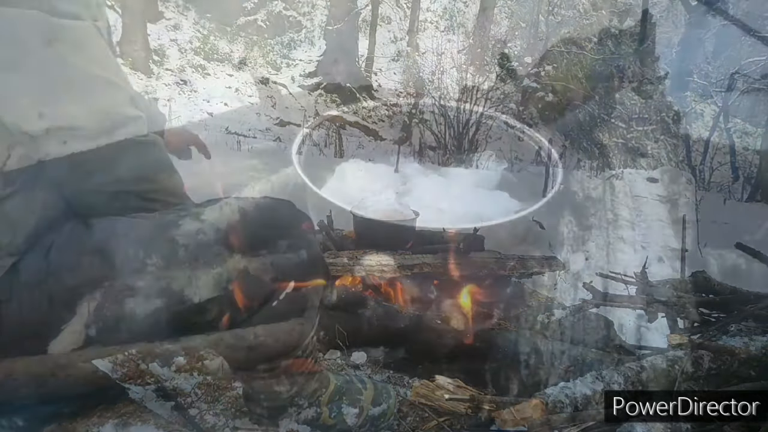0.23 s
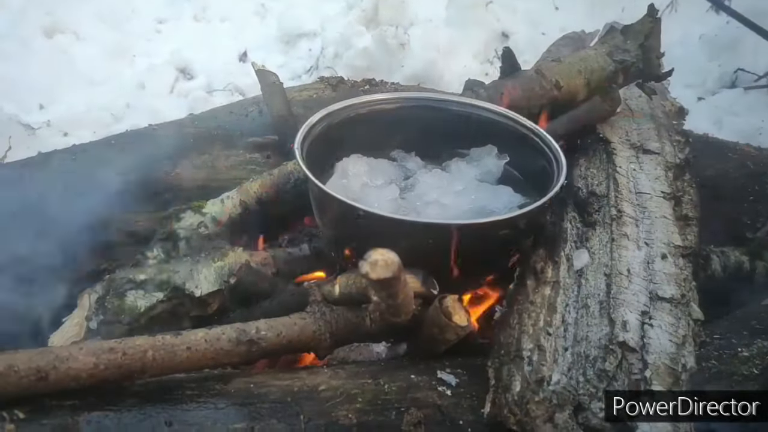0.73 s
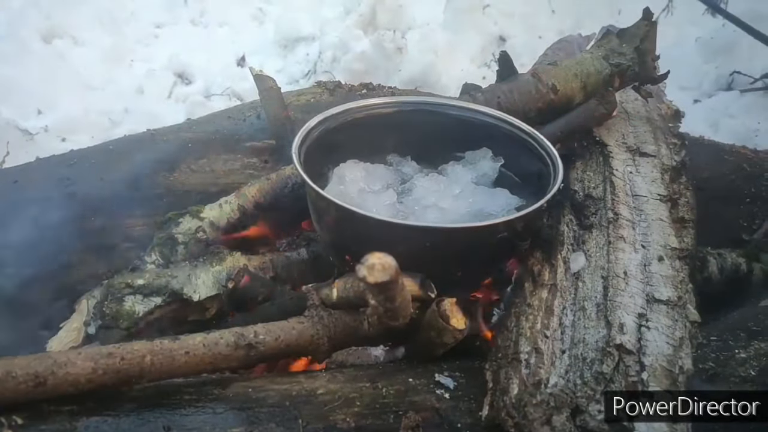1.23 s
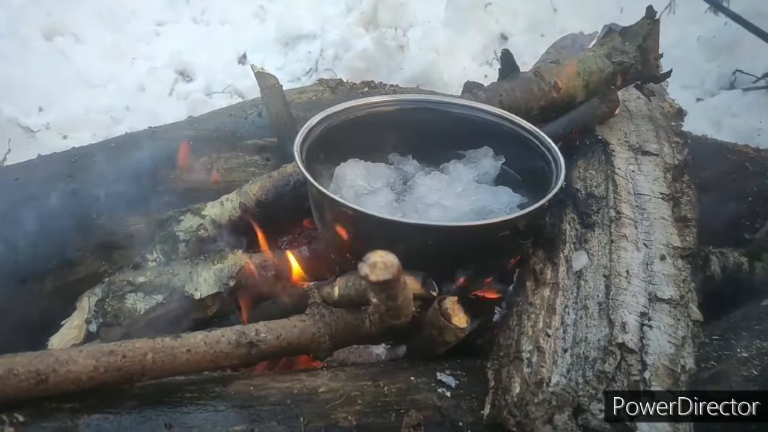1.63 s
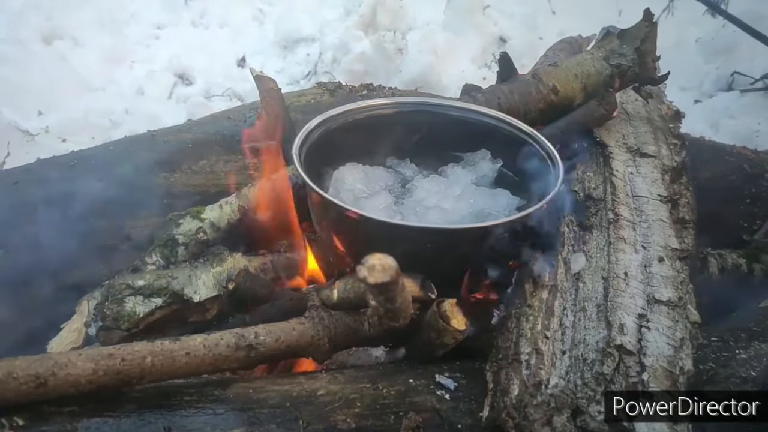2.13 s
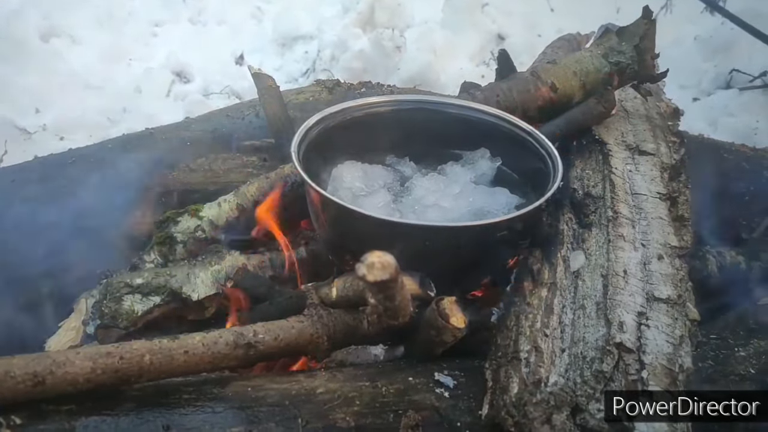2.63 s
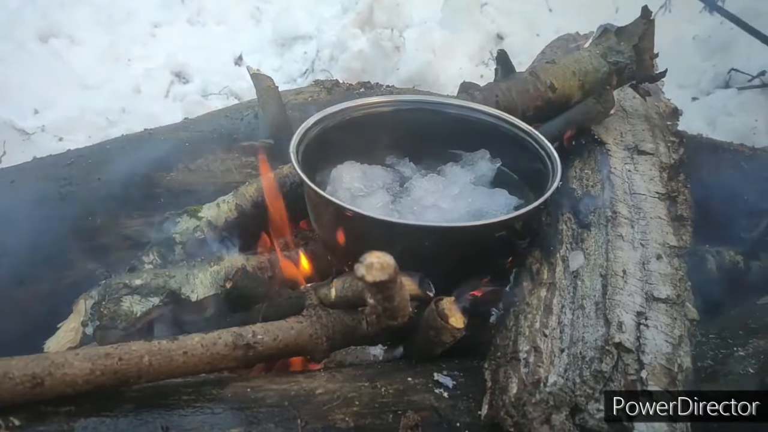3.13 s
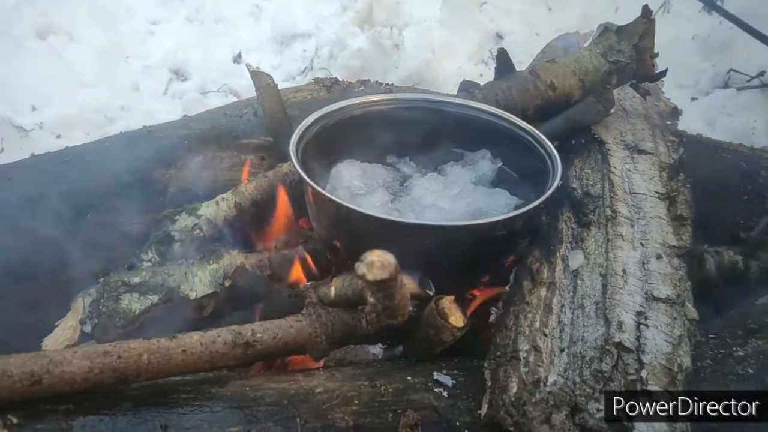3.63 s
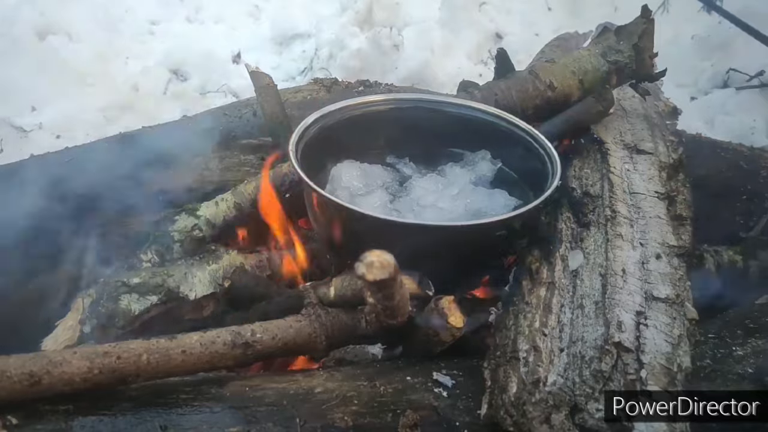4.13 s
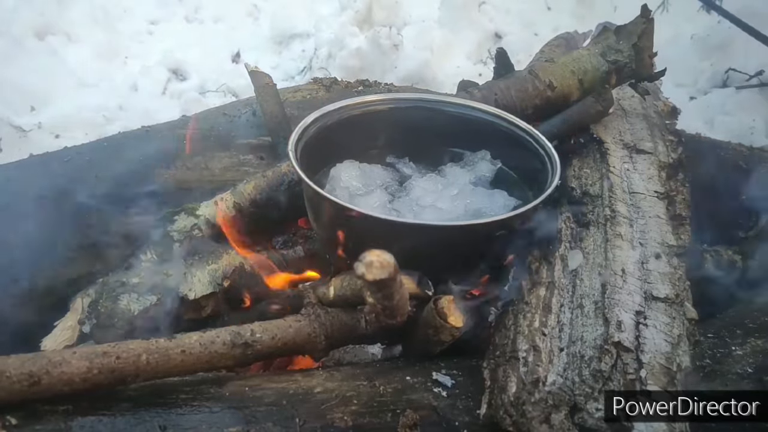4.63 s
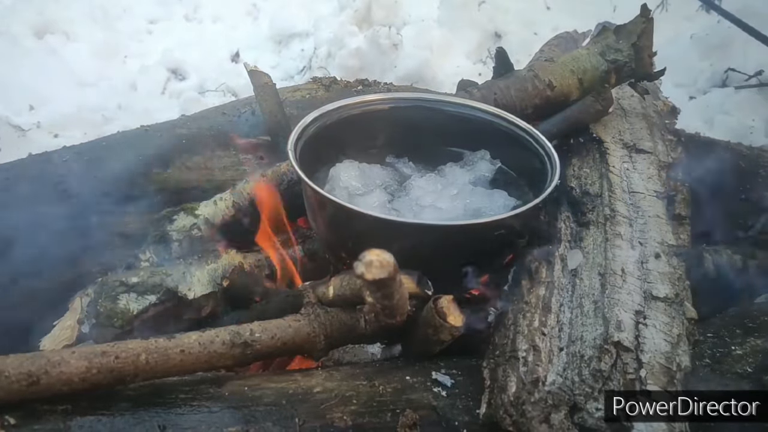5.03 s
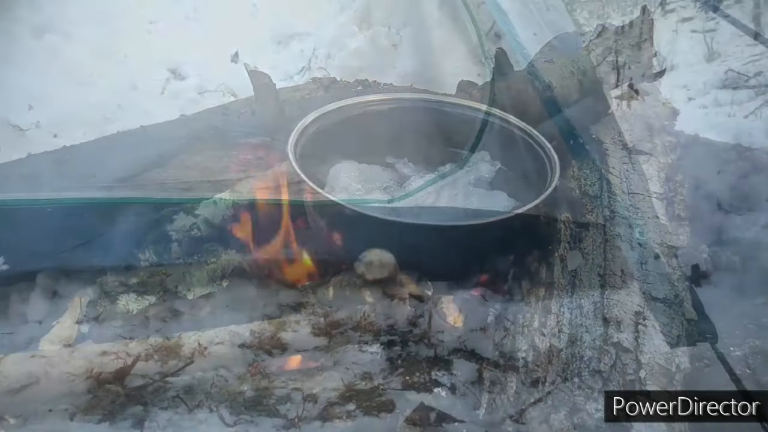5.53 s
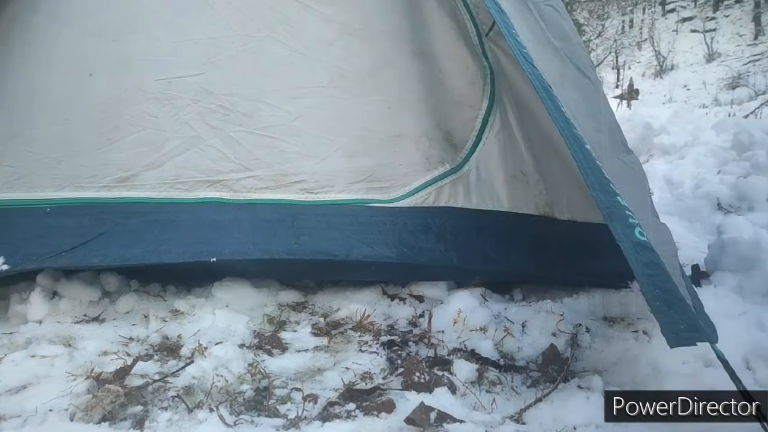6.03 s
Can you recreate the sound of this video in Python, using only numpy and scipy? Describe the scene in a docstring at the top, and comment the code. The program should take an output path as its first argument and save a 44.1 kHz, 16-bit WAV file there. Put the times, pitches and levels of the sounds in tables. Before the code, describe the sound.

Quiet distant woodland air and wind rumble, with small bright ticks, break off for a moment. A damp-wood fire appears suddenly at close range, sizzling grainily over a low fluttering roar, with scattered snaps and duller pops. Two hard wind knocks come early on the right. Finally heavy steps crush crusty snow near a tent, the fire stops abruptly, and wind rumbles mostly on the left.

```python
"""A camp fire heard in a snowy wood: first from afar, then after a short silence close by, then at a tent.
Steam hisses from damp logs as noise with coarse grains; the flames roar softly below it, with flares.
Wood cracks and pops as short decaying tones; boots crunch snow as dense clicks over dull thuds, first
under the end of the fire. Wind buffets the two microphone ports as low, slowly varying noise with
sharp pushes on the right; a faint air of the wood is heard far from the fire."""
import sys
import numpy as np
from scipy import signal
from scipy.fft import rfft, irfft, next_fast_len
from scipy.io import wavfile

SR = 44100
rng = np.random.default_rng(int(sys.argv[2]) if len(sys.argv) > 2 else 0)


def file_out(sig):
    """Save sig as 16-bit WAV at sys.argv[1]."""
    # one column per channel
    cols = np.atleast_2d(sig).T
    # limit, then scale
    lim = np.clip(cols, -1, 1)
    pcm = np.round(lim * 32767).astype(np.int16)
    wavfile.write(sys.argv[1], SR, pcm)


N = 276639
SIZE = next_fast_len(N)
HZ = np.maximum(np.fft.rfftfreq(SIZE, 1 / SR), 1)
T = np.arange(N) / SR
FIRE_LAG_S, TENT_LAG_S = .00016, .00034   # the left port hears later


def from_db(db):
    """Amplitude ratio: 20 dB is a factor of ten."""
    return 10 ** (np.asarray(db) / 20)


def rms_one(x):
    """Normalisation to unit effective value."""
    return x / np.sqrt(np.mean(x ** 2) + 1e-20)


def in_time(rows):
    """Linear interpolation in time: the columns of a curve, sample by sample."""
    s, *columns = np.transpose(rows)
    return [np.interp(T, s, c) for c in columns]


def at_hz(points):
    """Interpolation over log frequency: a spectral curve, bin by bin."""
    hz, values = np.transpose(points)
    return np.interp(np.log(HZ), np.log(hz), values)


def panned(db):
    """Level difference between the ports: half is added at the left and half taken from the right."""
    return from_db(np.array([db / 2, -db / 2]))


def during(start_s, end_s):
    """Rectangular gate: one between two times, otherwise zero."""
    return (T >= start_s) & (T < end_s)


def drift(rate_hz):
    """Lowpass random process: noise through a double real pole, scaled to spread 1."""
    step = 40   # samples between the drawn values
    pole = np.exp(-2 * np.pi * rate_hz * step / SR)
    noise = rng.standard_normal(N // step + 2002)
    slow = signal.lfilter([1], [1, -2 * pole, pole ** 2], noise)[2000:]   # drop the filter's start
    return np.interp(np.arange(N) / step, np.arange(len(slow)), rms_one(slow))


def white():
    """Gaussian white noise: equal power per hertz, in three independent streams."""
    return rng.standard_normal((3, SIZE))


def grains(per_s, spread_db):
    """Shot noise: three streams of random clicks of either sign, their sizes spread in dB; rms 1."""
    size_db = spread_db * np.minimum(rng.exponential(1, (3, SIZE)), 5)
    sizes = from_db(size_db) * rng.choice([-1, 1], (3, SIZE))
    struck = rng.random((3, SIZE)) < per_s / SR
    return rms_one(sizes * struck)


def at_ports(streams, colour, like, balance_db, lag_s, patchy_db, flicker_hz, in_step=1.0, count=10):
    """Partial coherence: a shared and two separate streams, coloured, in flickering bands; rms 1."""
    shared, left, right = rfft(streams)
    like = np.clip(like, 0, 1)   # share of power common to both ports
    late = shared * np.exp(-2j * np.pi * HZ * lag_s)
    common = np.sqrt(like) * np.array([late, shared])
    separate = np.sqrt(1 - like) * np.array([left, right])
    pair = (common + separate) * from_db(at_hz(colour)) * panned(balance_db * np.ones_like(HZ))
    # overlapping bands spread over five octaves from the lowest colour point
    place = (count - 1) * np.clip(np.log2(HZ / colour[0][0]) / 5, 0, 1)
    out, together = 0, drift(flicker_hz / 2)
    for k in range(count):
        weight = np.maximum(1 - abs(place - k), 0)
        band = irfft(pair * weight, SIZE)[:, :N]
        flicker = in_step * together + drift(flicker_hz)
        out = out + band * from_db(patchy_db * flicker)
    return rms_one(out)


def lump(s, peak_db, ms):
    """Pressure pulse: a smooth swelling on a squared-sech time scale, with faint opposite skirts."""
    u = (T - s) / (ms / 1000)
    return from_db(peak_db) * (1 - u ** 2 / 4) / np.cosh(np.clip(u, -20, 20)) ** 2


def bursts(events, cycles, tail_s, tail_db, lag_s=FIRE_LAG_S):
    """Damped resonance: each break rings at its pitch with a band of noise around it."""
    out, t = np.zeros((2, N)), np.arange(3000) / SR
    puffs = rng.standard_normal((len(events), 2, len(t)))
    for (s, peak_db, hz, pan_db), puff in zip(events, puffs):
        # the tone falls 60 dB in the given cycles, the puff 60 dB in tail_s
        snap = np.sin(2 * np.pi * hz * t) * from_db(-60 * t * hz / cycles)
        edges = [.45 * hz, min(2.5 * hz, .45 * SR)]
        puff = rms_one(signal.sosfilt(signal.butter(2, edges, "band", fs=SR, output="sos"), puff))
        tail = from_db(tail_db - 60 * t / tail_s) * puff
        both = from_db(peak_db) * panned(pan_db)[:, None] * (snap + tail)
        for side, start_s in enumerate((s + lag_s, s)):
            i = round(start_s * SR)
            out[side, i:i + len(t)] += both[side]
    return out


# vigour of the fire close by, as the level of its steam: (time [s], level [dB])
FIRE_VIGOUR = [(0.72, -36), (0.87, -32), (1.07, -35), (1.18, -32.5), (1.4, -34), (1.59, -33), (2.07, -34.5),
               (2.57, -34.5), (2.69, -32.5), (2.96, -33.5), (3.1, -31), (3.3, -33.5), (3.53, -33),
               (5.0, -34.5), (5.5, -32), (5.71, -33.5)]
# relative spectrum of the steam: (frequency [Hz], density [dB per Hz])
STEAM_COLOUR = [(500, -16.5), (900, -11.5), (1620, -8.5), (2070, -3), (2800, -4.5), (3270, -1.5),
                (3650, -4.5), (4300, 2), (4900, 0.5), (5750, -7.5), (6000, -1), (6350, -4), (6900, 1.5),
                (7900, -1.5), (9900, 4), (11500, -1), (14000, -2.5), (15700, -7)]
# side difference of the steam: (frequency [Hz], left minus right [dB])
STEAM_BALANCE = [(1000, 0), (7000, 0), (8500, -3.5), (10000, -5.5), (12000, -1.5), (15000, -4.5)]
# coherence of the steam at the two ports: (frequency [Hz], likeness [0-1])
STEAM_LIKENESS = [(1000, 0.05), (3500, 0.37), (6000, 0.57), (7800, 0.03), (8800, 0.37), (10500, 0.47),
                  (12000, 0.27)]


def steam():
    """Jet noise: steam spits from the sap of the logs as broadband noise with coarse grains."""
    level_db, = in_time(FIRE_VIGOUR)
    jets = white() + .5 * grains(per_s=3600, spread_db=3.5)
    hiss = at_ports(jets, STEAM_COLOUR, at_hz(STEAM_LIKENESS), at_hz(STEAM_BALANCE), FIRE_LAG_S,
                    patchy_db=2.6, flicker_hz=14, in_step=.1, count=50)
    return from_db(level_db) * hiss


FLAME_DB, FLAME_SINKS_DB_PER_S = -40.5, 0.32   # at mean vigour, mid-time and mean wind; the flames die down
FLAME_FOLLOWS, FLAME_FANNED = 0.27, 0.21   # shares of the steam's and the wind's level swing [dB per dB]
# relative spectrum of the flames: (frequency [Hz], density [dB per Hz])
FLAME_COLOUR = [(60, 2.5), (150, 3), (330, -11.5), (480, -8), (600, -18), (750, -19), (1200, -23),
                (2000, -29.5)]


def flame():
    """Combustion roar: low noise and small pockets of gas catching, fanned by the wind."""
    steam_db, wind_db = in_time(FIRE_VIGOUR)[0], in_time(WIND_LEVELS)[0]
    level_db = FLAME_DB - FLAME_SINKS_DB_PER_S * (T - T.mean())
    level_db = level_db + FLAME_FOLLOWS * (steam_db - steam_db.mean())
    level_db = level_db + FLAME_FANNED * (wind_db - wind_db.mean())
    puffs = white() + .5 * grains(per_s=160, spread_db=1.5)
    roar = at_ports(puffs, FLAME_COLOUR, like=0.96, balance_db=0.93, lag_s=0,
                    patchy_db=2.0, flicker_hz=35, in_step=.9)
    return from_db(level_db) * roar


# pockets of gas that catch and draw the air in: (time [s], peak level [dB])
FLARES = [(1.4994, -25), (1.652, -34), (1.7521, -24), (2.0054, -21), (2.2128, -22), (2.775, -22.5),
          (3.0177, -23.5), (3.0716, -26.5), (4.0892, -20.5), (4.481, -24.5), (4.7791, -25)]


def flares():
    """Rarefaction pulse: a catching pocket draws the air in, alike at both ports."""
    return -sum(lump(s, peak_db, ms=1.5) for s, peak_db in FLARES)


def fire():
    """Superposition: the steam, the flames and the flares add up in the fire close by."""
    return steam() + flame() + flares()


# cracks of wood, mostly bright, with a lower click and the sharp start of a pop:
# (time [s], tone level before pan [dB], pitch [Hz], left minus right [dB])
CRACKS = [(.1292, -29.5, 7000, 1.5), (.3715, -34, 6000, 3), (.4088, -23, 7960, 1),
          (1.3542, -19.5, 4800, -1), (1.3562, -22, 9000, 4), (1.3657, -15.5, 4500, 6),
          (1.3672, -21, 8500, 5), (2.158, -20, 7000, -3), (2.4555, -27, 900, 3), (3.5134, -13, 7900, 3),
          (3.7083, -25, 1150, 2), (3.8835, -15, 9100, 2), (5.9509, -33, 9000, .3)]


def cracks():
    """Brittle fracture: quickly damped tones, mostly bright, with a lower click and a pop's sharp start."""
    return bursts(CRACKS, cycles=5.5, tail_s=.014, tail_db=-9)


# dull pops in the logs: (time [s], tone level before pan [dB], pitch [Hz], left minus right [dB])
POPS = [(1.506, -33, 480, 3), (1.569, -30, 807, 1), (1.698, -33, 670, -1), (2.454, -35, 400, 2),
        (3.708, -24, 490, 0), (4.576, -29, 470, 3)]


def pops():
    """Damped resonance: the logs pop at a low pitch and ring for more cycles than a crack."""
    return bursts(POPS, cycles=11, tail_s=.014, tail_db=-14)


# boots coming down, the heaviest step in four scuffs:
# (time [s], held [s], crunch level [dB], weight level [dB])
STEPS = [(5.46, 0.068, -37, -57), (5.612, 0.011, -34.5, -54), (5.776, 0.019, -31.5, -33),
         (5.82, 0.0078, -30, -28), (5.842, 0.014, -36, -54), (5.86, 0.0096, -28.5, -31.5),
         (6.057, 0.012, -49, -40.5), (6.135, 0.012, -40, -56)]
# snow settling between the steps: (time [s], crunch level [dB], weight level [dB])
SETTLING = [(5.1, -42, -76), (5.56, -37.5, -70), (5.73, -43, -48), (5.9, -38.5, -46), (6.03, -38.5, -40),
            (6.08, -39.5, -56), (6.27, -41.5, -48)]
CRUNCH, WEIGHT = 0, 1   # the two snow layers, in the order of their level columns


def pressed(layer, dies_db_per_s):
    """Addition of powers: every step swells, holds and fades over the settling of one layer."""
    power = from_db(in_time(SETTLING)[layer]) ** 2
    for s, held_s, *levels_db in STEPS:
        before_s = np.maximum(s - T, 0)
        after_s = np.maximum(T - s - held_s, 0)
        step_db = levels_db[layer] - 500 * before_s - dies_db_per_s * after_s   # swells at 500 dB/s
        power = power + from_db(step_db) ** 2
    return np.sqrt(power)


# relative spectrum of the breaking snow: (frequency [Hz], density [dB per Hz])
SNOW_COLOUR = [(530, -10), (900, -6), (1250, -7.5), (1600, -8.5), (1990, -7.5), (2300, -9), (2810, -6.5),
               (4150, -5), (4730, -8), (5020, -9), (10300, -6), (15300, -12)]
# side difference of the breaking snow: (frequency [Hz], left minus right [dB])
SNOW_BALANCE = [(1000, 1.5), (8000, -0.5), (10500, -3), (15000, -1)]
# coherence of the breaking snow at the two ports: (frequency [Hz], likeness [0-1])
SNOW_LIKENESS = [(1000, 0.82), (2000, 0.74), (4000, 0), (15000, 0.1)]


def crunch():
    """Granular fracture: snow crystals break in dense clicks over smooth noise."""
    breaking = white() + grains(per_s=2700, spread_db=0.0)
    snow = at_ports(breaking, SNOW_COLOUR, at_hz(SNOW_LIKENESS), at_hz(SNOW_BALANCE), TENT_LAG_S,
                    patchy_db=1.4, flicker_hz=45, in_step=.6)
    return snow * pressed(CRUNCH, dies_db_per_s=354)


# relative spectrum of the packing snow: (frequency [Hz], density [dB per Hz])
PACKING_COLOUR = [(100, 3), (200, 1), (400, -12.5), (800, -11), (1300, -14), (2500, -50)]


def packing():
    """Low-frequency impulse noise: the packing snow thuds under the weight of the boots."""
    thuds = at_ports(grains(per_s=590, spread_db=3.0), PACKING_COLOUR, like=0.95, balance_db=-1.9,
                     lag_s=TENT_LAG_S, patchy_db=1.5, flicker_hz=7.1)
    return thuds * pressed(WEIGHT, dies_db_per_s=600)


# crust giving way under a boot: (time [s], tone level before pan [dB], pitch [Hz], left minus right [dB])
CRUST = [(5.435, -33, 800, 2), (5.461, -31, 450, 4), (5.465, -30, 740, 4), (5.483, -31, 720, 2),
         (5.492, -28, 760, 1), (5.499, -30, 740, 1), (5.511, -34, 800, 1), (5.523, -33, 700, 4),
         (5.62, -26, 1820, 5), (5.669, -29, 420, 2), (5.777, -24, 328, -2), (5.789, -27, 260, 0),
         (5.816, -26, 170, 0), (5.827, -18, 211, -2), (5.828, -27, 850, 0), (5.859, -22, 200, 2),
         (5.866, -28, 422, -8), (5.869, -28, 900, 0), (5.919, -28, 700, -2), (6.061, -29, 700, 0),
         (6.062, -28, 1400, 2), (6.121, -30, 850, 2), (6.14, -30, 900, 0), (6.146, -28, 760, -1)]


def crust():
    """Brittle failure: each break of the crust is a damped tone with a puff of noise."""
    return bursts(CRUST, cycles=12, tail_s=.03, tail_db=-14, lag_s=TENT_LAG_S)


def boots():
    """Superposition: crust, crunch and packing add up under the boots."""
    return crust() + crunch() + packing()


# wind on the ports: (time [s], level before pan [dB], left minus right [dB])
WIND_LEVELS = [(0.05, -30.5, 4), (0.34, -28, -8.5), (0.47, -36, -4.5), (0.72, -29, 3.5), (0.88, -27.5, -16),
               (1.1, -37, -26), (1.27, -34.5, 9), (1.38, -33.5, -7), (1.59, -22, 7), (1.8, -31.5, 4),
               (2.54, -33, -10), (2.94, -38.5, -1), (3.08, -27, -9), (3.2, -37.5, 6), (3.5, -30, -15),
               (3.64, -33.5, -3), (3.76, -30, -11), (4.25, -39.5, -13.5), (4.45, -34, -2),
               (5.15, -36.5, -0.5), (5.7, -32, 6.5), (5.82, -28.5, 13), (5.95, -33, 7), (6.13, -27, 12),
               (6.27, -29.5, 9)]
# relative spectrum of the wind: (frequency [Hz], density [dB per Hz])
WIND_COLOUR = [(12, 2.5), (30, 0.5), (60, -3.5), (120, -17.5), (250, -36.5), (500, -71), (1000, -62.5)]


def eddies():
    """Turbulent pressure: lumpy low noise, only partly alike at the two ports."""
    level_db, pan_db = in_time(WIND_LEVELS)
    noise = at_ports(white(), WIND_COLOUR, like=0.43, balance_db=0, lag_s=0,
                     patchy_db=2.3, flicker_hz=21.6, in_step=0.95)
    return noise * from_db(level_db) * panned(pan_db)


# sharp buffets: (time [s], peak level [dB], time scale [ms], +1 push or -1 suck)
BUFFETS = [(0.3474, -15.5, 2.06, -1), (0.8266, -16, 2.7, -1), (0.876, -4.5, 1.66, 1),
           (0.915, -14.5, 1.2, 1), (0.969, -20, 1.6, 1), (.999, -5, 1.46, 1), (1.3656, -16, 2.8, 1),
           (1.4546, -21, 2.6, 1), (1.9105, -20, 2, 1), (2.292, -18.5, 2.6, 1), (3.107, -16, 1.6, 1),
           (3.4107, -20, 1.8, 1), (4.383, -15.5, 2.2, 1)]
REBOUND_S, REBOUND_DB, REBOUND_WIDER = .02, -8, 2.4   # delay, relative level, times the time scale


def buffets():
    """Pressure pulse and rebound: the air swings back, softer and slower, at the right port only."""
    out = np.zeros((2, N))
    for s, peak_db, ms, sign in BUFFETS:
        push = lump(s, peak_db, ms)
        rebound = lump(s + REBOUND_S, peak_db + REBOUND_DB, ms * REBOUND_WIDER)
        out[1] += np.sign(sign) * (push - rebound)
    return out


def wind():
    """Superposition: the eddies and the single buffets add up at the ports."""
    return eddies() + buffets()


# relative spectrum of the air of the wood: (frequency [Hz], density [dB per Hz])
AIR_COLOUR = [(150, -49), (250, -12.5), (371, -15), (644, -21), (727, -18), (1420, -22.5), (1750, -21),
              (2930, -24), (4430, -28), (15300, -32)]


def air():
    """Diffuse background noise: the steady air of the wood, far from the fire, sooner at the left."""
    noise = at_ports(white(), AIR_COLOUR, like=.3, balance_db=1.2, lag_s=-.0003,
                     patchy_db=.3, flicker_hz=14)
    return from_db(-50) * noise


def scene():
    """Superposition of gated sources: afar, close by and at the tent, with abrupt starts and ends."""
    far, near, tent = during(0, .472), during(.7022, 5.7225), during(5.1, 6.3)
    windy = far | (T >= .7022)   # no wind sounds in the short silence between afar and close by
    return near * fire() + cracks() + pops() + tent * boots() + windy * wind() + far * air()


def record(dry):
    """Elliptic lowpass: the spectrum is cut steeply above 15500 Hz."""
    return signal.sosfilt(signal.ellip(12, .5, 80, 15500, fs=SR, output="sos"), dry)


dry = scene()
out = record(dry)
file_out(out)
```